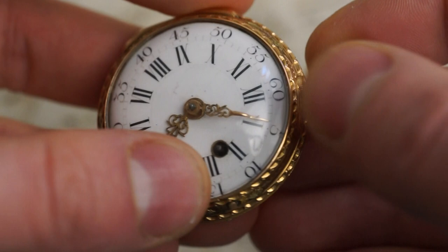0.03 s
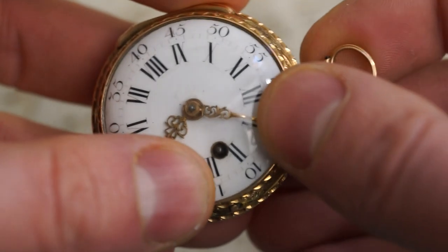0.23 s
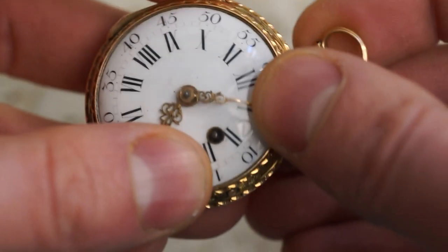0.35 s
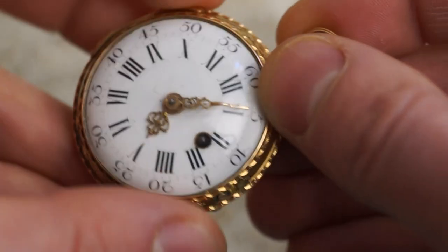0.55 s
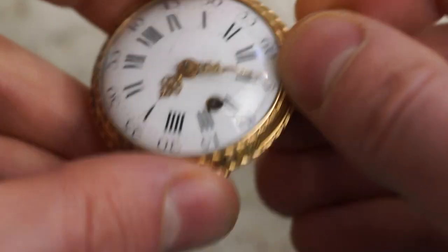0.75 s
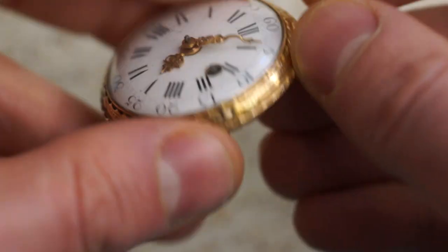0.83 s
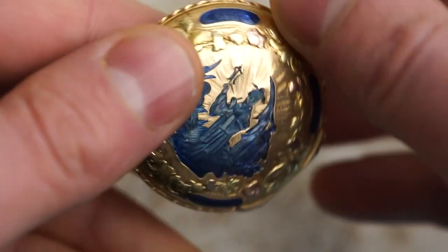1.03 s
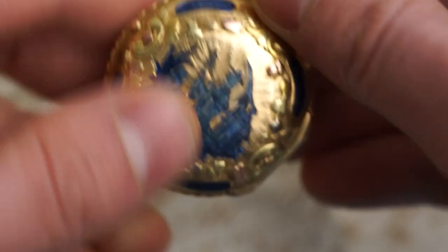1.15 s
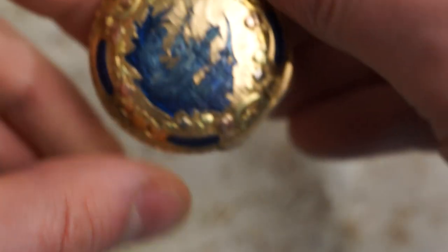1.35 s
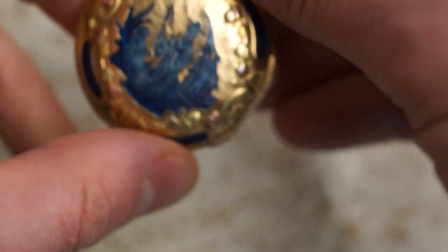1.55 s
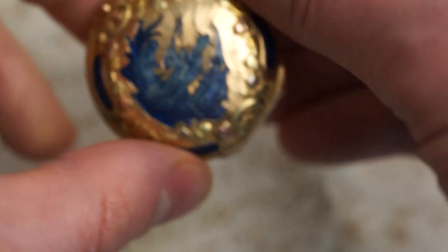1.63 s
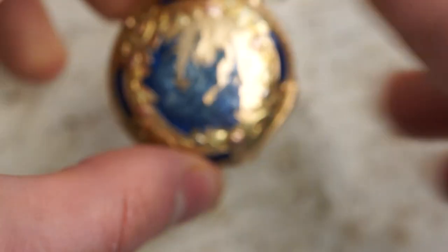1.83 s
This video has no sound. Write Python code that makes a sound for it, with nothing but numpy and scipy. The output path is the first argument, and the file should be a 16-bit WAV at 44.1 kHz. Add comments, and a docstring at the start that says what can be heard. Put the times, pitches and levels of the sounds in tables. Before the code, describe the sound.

A metal pocket watch case snaps shut: a barely audible tick at the start, then one loud, hard crack at 0.22 s, finger-damped, with a small thump and brief room tail. Quiet handling follows: a tight cluster of light ticks near 1.05 s, a fainter one at 1.19, another at 1.75, and a crisp bright click at 1.84. Faint skin rubs, low grip rumbles and soft room tone, closely miked.

```python
"""A faint metallic tick, then one hard crack: a metal pocket watch snaps shut close to a microphone.
The crack is broad noise shaped by finger-damped case resonances, with a thump, shimmer and rim seating.
Bow and crown then tick as the watch is turned: dying sines, a dull knock and short bounces.
Fingers and grip are swelling bands of noise. A small quiet room adds scatter, tails and steady tone."""
import sys
import numpy as np
from scipy import signal
from scipy.fft import rfft, irfft
from scipy.io import wavfile

SR = 44100
rng = np.random.default_rng(int(sys.argv[2]) if len(sys.argv) > 2 else 0)


def to_wav(sig):
    """Store sig (one row per channel, or 1-D mono) as 16-bit WAV at the path in sys.argv[1].

    Samples outside -1..1 are clipped; the rate is SR.
    """
    pcm = np.clip(np.atleast_2d(sig), -1, 1) * 32767
    pcm = np.round(pcm).astype(np.int16)
    wavfile.write(sys.argv[1], SR, pcm.T)  # frames by channels


N = 83790

# Resonances of the closed, hand-held case: (frequency [Hz], peak level [dB], t60 [s])
CASE_MODES = [(650, 20, 0.019), (764, 10, 0.032), (1114, 9, 0.034), (1620, 11.5, 0.014), (1804, 18, 0.017),
              (2570, 9.5, .014), (3660, 17.5, 0.0097), (4000, 8, .014), (4690, 13, 0.031),
              (5255, 16.5, 0.045), (6700, 5, 0.03), (7350, 13.5, 0.028), (8750, 11, .014),
              (9100, 8.5, 0.018), (10450, 0, 0.018), (11700, -1, .016)]
# Broad crack under those resonances: (frequency [Hz], level [dB])
CRACK_COLOUR = [(20, -18), (100, -4), (220, -0.5), (400, -1), (1000, 1), (2000, 3), (4000, 0), (6000, -7.5),
                (9000, 0), (12000, -14), (16000, -11)]
# Bending waves below these are delayed behind the treble: (left [Hz], right [Hz])
BENDING_HZ = [4900, 2900]
# Blow into the palm: (frequency [Hz], energy [dB], t60 [s])
THUMP_MODES = [(185, -24, .016)]
# Crowd of small case modes: (frequency [Hz], level [dB])
SHIMMER_COLOUR = [(100, -40), (1000, -11.5), (3000, -5.5), (5500, 3.5), (10000, -7.5), (16000, -18)]
# Rim seating just after the catch: (frequency [Hz], level [dB])
SEAT_COLOUR = [(100, -25), (700, -4), (1800, 0.5), (4000, -1.5), (10000, 0.5), (16000, -15)]
SNAP_S, SNAP_DB = 0.2204, 3
SHIMMER_DB, SHIMMER_T60_S = -5, 0.039
SEAT_DELAY_S, SEAT_DB, SEAT_T60_S = 0.0017, -4.5, 0.0097

# Loose metal touching the case: (time [s], bright clink [dB], dull knock [dB], chatter length [s],
# singing mode [Hz], its energy [dB], its t60 [s])
TICK_EVENTS = [(0.0157, -31.5, -30, 0.0024, 8770, -27, 0.017), (1.0462, -24.5, -32, 0.0031, 1810, -37, .02),
               (1.0551, -20.5, -38.5, .002, 5700, -36, 0.14), (1.0600, -25.5, -40, .0035, 14900, -33, .012),
               (1.188, -32, -35, .013, 7460, -35.5, 0.12), (1.7514, -30, -36, 0.0027, 6900, -35.5, .02),
               (1.8416, -12.5, -37, .0016, 15100, -19, 0.0098), (1.8457, -20.5, -43, .002, 6630, -23, .014)]
# Modes of bow and crown: (frequency [Hz], energy [dB], t60 [s])
BOW_MODES = [(3918, -14.5, 0.038), (5630, -17.5, .03), (6330, -14.5, 0.037), (6770, -15.5, 0.03),
             (7260, -16, 0.049), (8660, -13.5, 0.049)]
# Contact noise: (frequency [Hz], level [dB])
CLINK_COLOUR = [(200, -30), (1500, -29), (3000, -15), (4800, -6.5), (6800, -0.5), (9500, 0), (13000, -4),
                (15000, -0.5), (16000, -8)]
# Dull answer of the held case: (frequency [Hz], level [dB])
KNOCK_COLOUR = [(200, -16), (800, -7), (1700, 3), (2600, -11.5), (3600, -4), (6000, -22), (16000, -22)]
# Room's return of a tick: (frequency [Hz], level [dB])
TICK_ROOM_COLOUR = [(200, -30), (1500, -13), (3500, -9), (4800, -8), (6800, 2), (9000, -3), (12000, -5),
                    (16000, -7)]
CLINK_DB, CLINK_T60_S, KNOCK_T60_S = -1, 0.016, 0.027  # clink level is relative to the bow
FIRST_BOUNCE_DB, BOUNCE_STEP_DB = 1, -1.5  # first bounce re initial contact; change per later bounce
TICK_ROOM_DB = -8  # relative to the bow

# Fingers sliding on the case: (time [s], length [s], level [dB], centre [Hz], width [octaves])
RUB_EVENTS = [(0.79, .12, -71.5, 3500, .5), (0.992, 0.072, -64, 6950, 1), (1.614, 0.34, -69, 6940, 1),
              (1.75, 0.21, -61, 1320, 0.51)]
# Soft rumbles of the shifting grip: (time [s], length [s], level [dB], centre [Hz], width [octaves])
GRIP_EVENTS = [(0.172, 0.34, -63, 40.3, .5), (0.563, 0.19, -62, 77, 0.15), (.84, 0.31, -64.5, 34.5, 0.18),
               (1.154, 0.207, -65, 150, 0.89), (1.373, 0.094, -60.5, 134, 0.43),
               (1.753, 0.079, -56.5, 158, 0.32)]

# Decay of the room: (frequency [Hz], t60 [s])
ROOM_T60 = [(150, 0.23), (700, 0.37), (2000, 0.45), (5500, 0.42), (8000, 0.31), (15000, 0.27)]
# Room's return of the snap: (frequency [Hz], level [dB])
SNAP_ROOM_COLOUR = [(100, -15), (330, -4.5), (620, 7), (850, 9.5), (1080, 5.5), (1300, -4), (1800, 4),
                    (2600, -1), (4000, -1.5), (5600, 1.5), (8000, -1), (11000, -4.5), (16000, -13)]
# Left-right likeness of the room: (frequency [Hz], correlation [0-1])
ROOM_SAME = [(200, 0.93), (800, 0.91), (1600, 0.31), (12000, 0.15)]
# Room tone: (frequency [Hz], relative spectral density [dB])
AIR_COLOUR = [(10, -26), (30, -5), (50, -8), (75, -4), (130, -9), (250, -14), (500, -20), (1200, -25.5),
              (3000, -28.5), (8000, -30.5), (16000, -32.5)]
# Left-right likeness of room tone and friction: (frequency [Hz], correlation [0-1])
AIR_SAME = [(60, .995), (160, .93), (500, .4), (1500, .1), (12000, .25)]
SNAP_ROOM_DB, ROOM_RISE_S = -4.5, 0.0092
NEAR_DB, NEAR_T60_S = -23.5, 0.034
AIR_DB = -58
METAL_SAME, MIC_LEAD_S = 0.2, 20e-6  # fine-ring correlation; phase lead of right-channel modes
EDGE_HZ = 15900
RING_T_S = np.arange(4096) / SR


def snap():
    """Catch release excites case, palm and fine modes; the rim seats and the room answers."""
    out = np.zeros((2, N))
    add(out, SNAP_S, amp(SNAP_DB) * struck_case())
    add(out, SNAP_S, ring(THUMP_MODES))
    add(out, SNAP_S, amp(SHIMMER_DB) * fine_ring(SHIMMER_COLOUR, SHIMMER_T60_S))
    add(out, SNAP_S + SEAT_DELAY_S, amp(SEAT_DB) * fine_ring(SEAT_COLOUR, SEAT_T60_S))
    add(out, SNAP_S, amp(SNAP_ROOM_DB) * room_tail(SNAP_ROOM_COLOUR))
    return out


def struck_case(size=4096):
    """A hard blow's broad crack plus damped resonances, as a minimum-phase impulse response."""
    hz = abs(np.fft.fftfreq(size, 1 / SR)) + 1
    power = amp(read(CRACK_COLOUR, hz)) ** 2
    for mode_hz, db, t60_s in CASE_MODES:
        q = np.pi * mode_hz * t60_s / np.log(1000)
        detuning = hz / mode_hz - mode_hz / hz
        power = power + amp(db) ** 2 / (1 + (q * detuning) ** 2)
    log_gain = np.log(power) / 2
    # the Hilbert transform of the log gain gives the minimum phase
    spectrum = np.exp(np.conj(signal.hilbert(log_gain)))
    causal = np.fft.ifft(spectrum).real[:size // 2]
    # all-pass per channel: lows arrive after the treble
    poles = np.exp(-2 * np.pi * np.array(BENDING_HZ) / SR)
    return unit(np.array([signal.lfilter([-p, 1], [1, -p], causal) for p in poles]))


def ticks(count=4):
    """Each touch rings the bow and a singing mode, knocks the case and chatters."""
    out = np.zeros((2, N))
    bounce = np.arange(count)
    later = bounce > 0
    strength = unit(amp(later * (FIRST_BOUNCE_DB + BOUNCE_STEP_DB * (bounce - 1))))
    for time_s, clink_db, knock_db, length_s, *singing in TICK_EVENTS:
        bow = amp(clink_db) * ring(BOW_MODES)
        knock = amp(knock_db) * fine_ring(KNOCK_COLOUR, KNOCK_T60_S)
        add(out, time_s, bow + ring([singing]) + knock)
        jitter = later * rng.uniform(-0.3, 0.3, count)
        delays_s = length_s * (bounce + jitter) / (count - 1)
        for delay_s, gain in zip(delays_s, strength):
            clink = fine_ring(CLINK_COLOUR, CLINK_T60_S)
            add(out, time_s + delay_s, gain * amp(clink_db + CLINK_DB) * clink)
        add(out, time_s, amp(clink_db + TICK_ROOM_DB) * room_tail(TICK_ROOM_COLOUR))
    return out


def ring(modes):
    """Struck modes: dying sines, slightly out of step between the two microphones."""
    t = RING_T_S + np.array([[0], [MIC_LEAD_S]])
    out = 0
    for hz, db, t60_s in modes:
        sine = np.sin(2 * np.pi * hz * t) * decay(t, t60_s)
        out = out + amp(db) * unit(sine)
    return out


def fine_ring(colour, t60_s):
    """Many close modes dying together: coloured noise under one exponential."""
    crowd = noise(len(RING_T_S), lambda hz: read(colour, hz), [(1000, METAL_SAME)])
    return unit(crowd * decay(RING_T_S, t60_s))


def fingers():
    """Skin on metal and grip shifts: band noise under half-sine swells."""
    out = np.zeros((2, N))
    t = np.arange(N) / SR
    for time_s, length_s, db, centre_hz, width_octaves in RUB_EVENTS + GRIP_EVENTS:
        def band_db(hz):
            """Resonance-like band: amplitude halves one width from the centre."""
            widths = np.log2((hz + 1) / centre_hz) / width_octaves
            return -20 * np.log10(1 + widths ** 2)
        swell = np.sin(np.pi * np.clip((t - time_s) / length_s, 0, 1))
        out += amp(db) * noise(N, band_db, AIR_SAME) * swell
    return out


def scatter(x):
    """Quick reflections from hands and table: the mono sum convolved with dying stereo noise."""
    near = noise(len(RING_T_S), np.zeros_like, ROOM_SAME) * decay(RING_T_S, NEAR_T60_S)
    return signal.fftconvolve(x.mean(0)[None], amp(NEAR_DB) * unit(near), axes=1)[:, :N]


def room_tail(colour, size=256):
    """Diffuse room answer to a coloured click: noise with frequency-dependent decay."""
    count = SR // 2
    steady = noise(count, lambda f: read(colour, f), ROOM_SAME)
    hz, t, bins = signal.stft(steady, SR, nperseg=size)
    bins = bins * decay(t, read(ROOM_T60, hz)[:, None])
    tail = signal.istft(bins, SR, nperseg=size)[1][:, :count]
    rise = np.minimum(np.arange(count) / SR / ROOM_RISE_S, 1)
    return unit(tail * rise)


def room_tone():
    """Steady coloured noise of the quiet room."""
    return amp(AIR_DB) * noise(N, lambda hz: read(AIR_COLOUR, hz), AIR_SAME)


def noise(count, colour_db, same):
    """Stereo noise of rms 1; colour_db is a function of Hz, same a correlation table."""
    hz = np.fft.rfftfreq(count, 1 / SR)
    mid, side = rfft(rng.standard_normal((2, count)))
    c = np.clip(read(same, hz), -1, 1)
    mid, side = mid * np.sqrt(1 + c), side * np.sqrt(1 - c)
    stereo = np.array([mid + side, mid - side])
    return unit(irfft(stereo * amp(colour_db(hz)), count)) * np.sqrt(count)


def decay(t, t60_s):
    """Exponential falling 60 dB in t60_s."""
    return np.exp(-np.log(1000) * t / t60_s)


def amp(db):
    """Decibels to gain."""
    return 10 ** (np.asarray(db) / 20)


def read(points, hz):
    """Table value, interpolated on a log-frequency axis."""
    f, value = np.transpose(points)
    return np.interp(np.log(hz + 1), np.log(f + 1), value)


def unit(x):
    """Scale to a mean channel energy of 1."""
    return x / np.sqrt(np.mean(np.sum(x ** 2, -1)) + 1e-20)


def add(mix, time_s, sound):
    """Mix a stereo sound in at time_s, cut at the end of the mix."""
    part = mix[:, max(round(time_s * SR), 0):][:, :sound.shape[1]]
    part += sound[:, :part.shape[1]]


def scene():
    """Watch with near scatter, fingers, and steady room tone."""
    watch = snap() + ticks()
    return watch + scatter(watch) + fingers() + room_tone()


def record(dry):
    """Recorder band limit: linear-phase low-pass at EDGE_HZ."""
    low_pass = signal.firwin(301, EDGE_HZ, window=("kaiser", 8), fs=SR)
    return signal.oaconvolve(dry, low_pass[None], "same")


dry = scene()
out = record(dry)
to_wav(out)
```